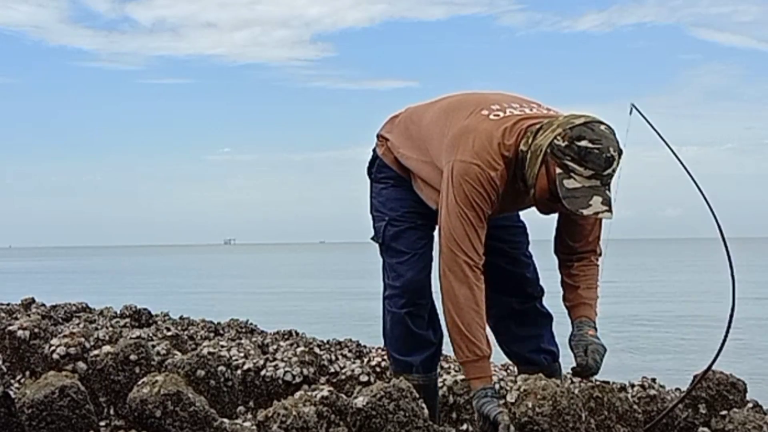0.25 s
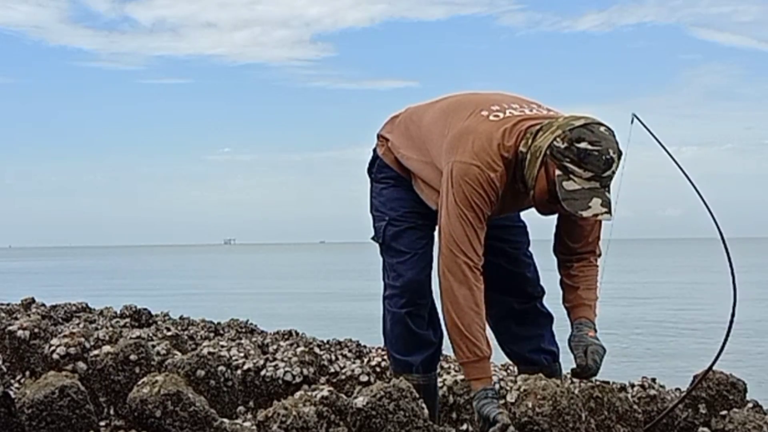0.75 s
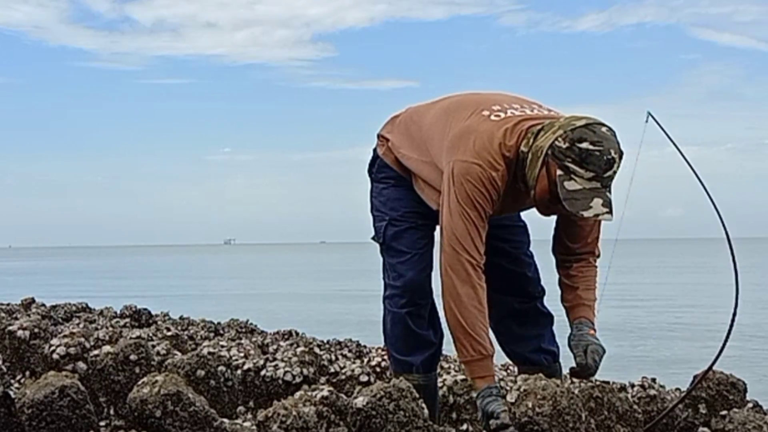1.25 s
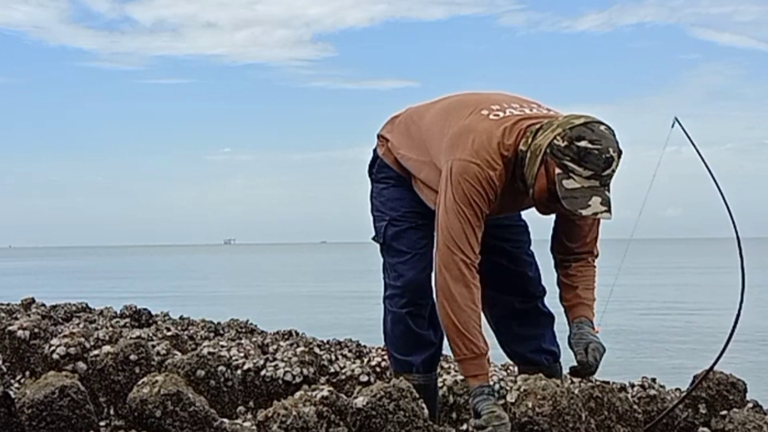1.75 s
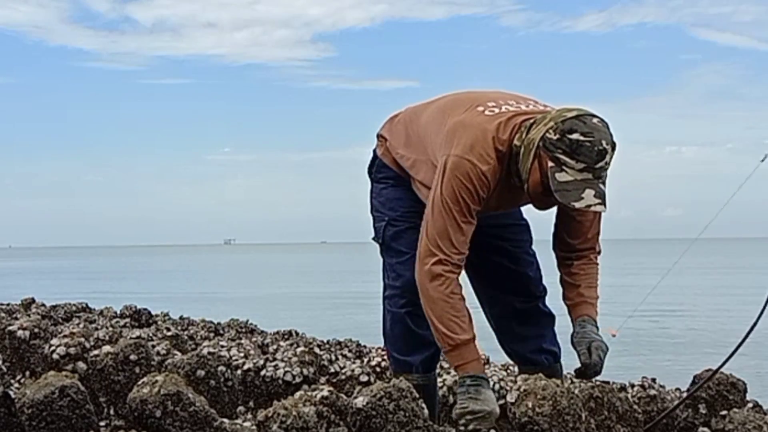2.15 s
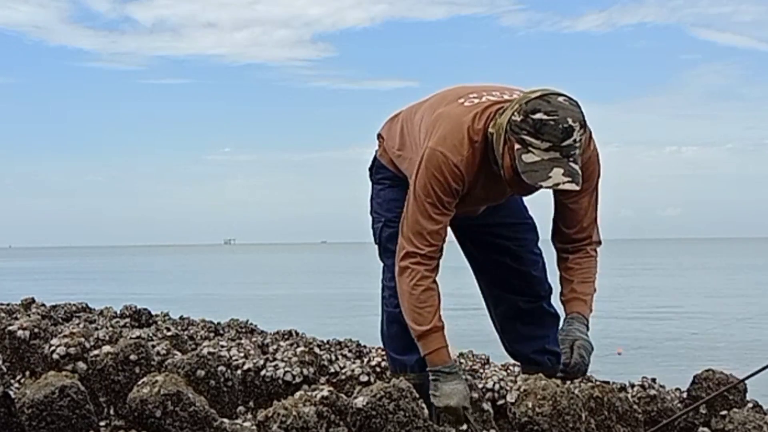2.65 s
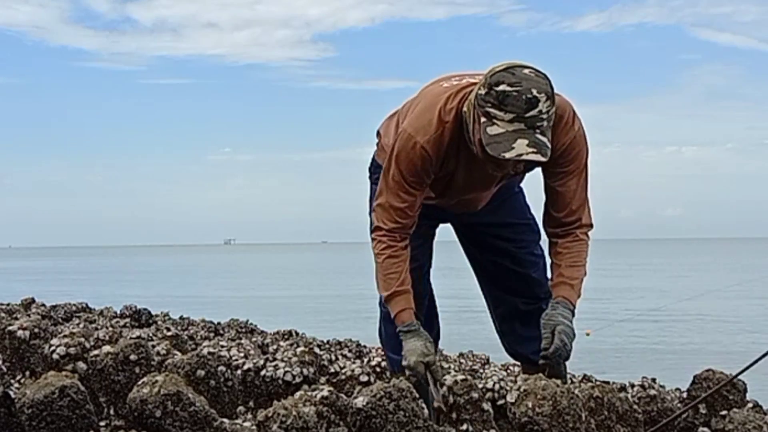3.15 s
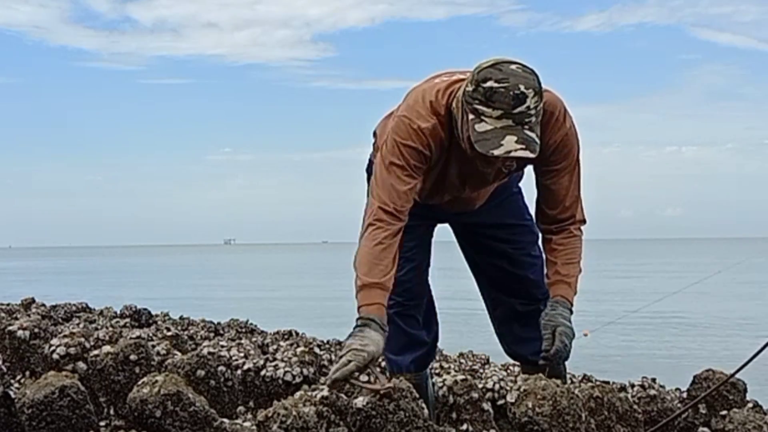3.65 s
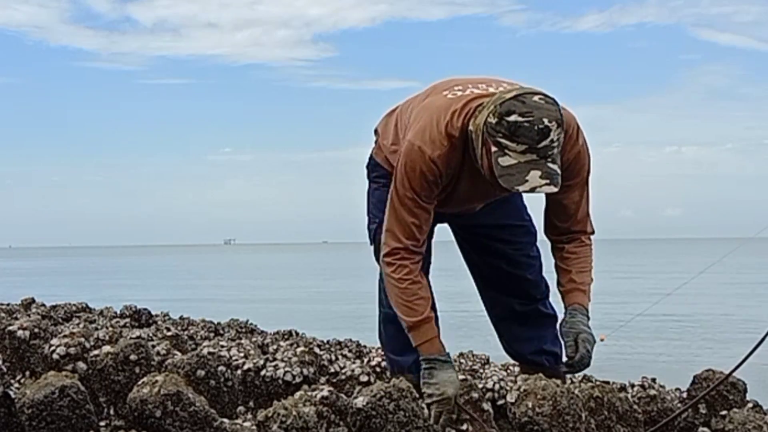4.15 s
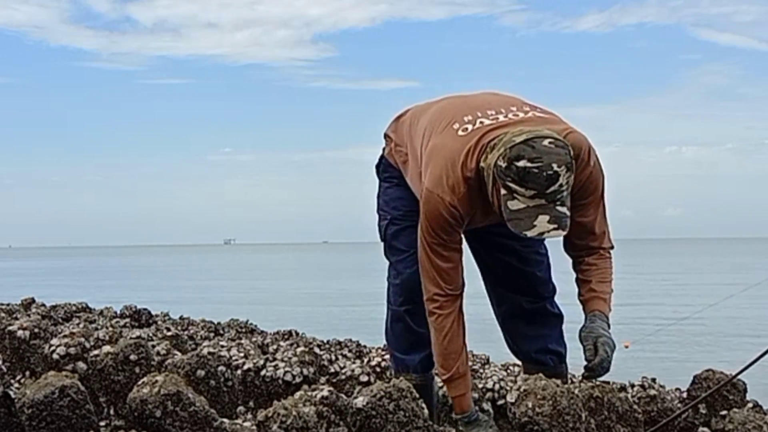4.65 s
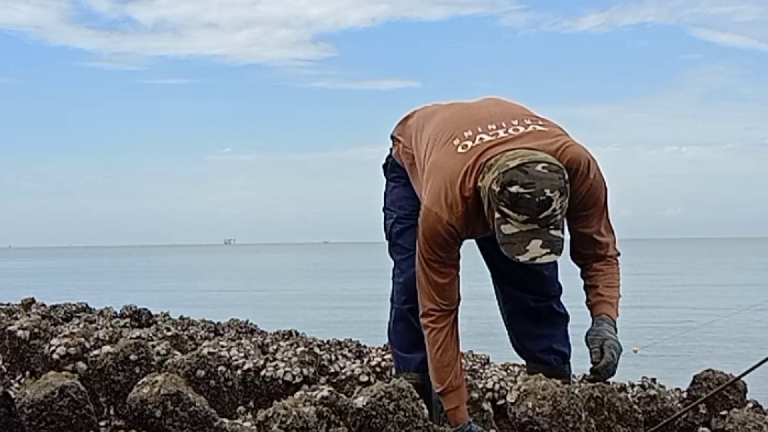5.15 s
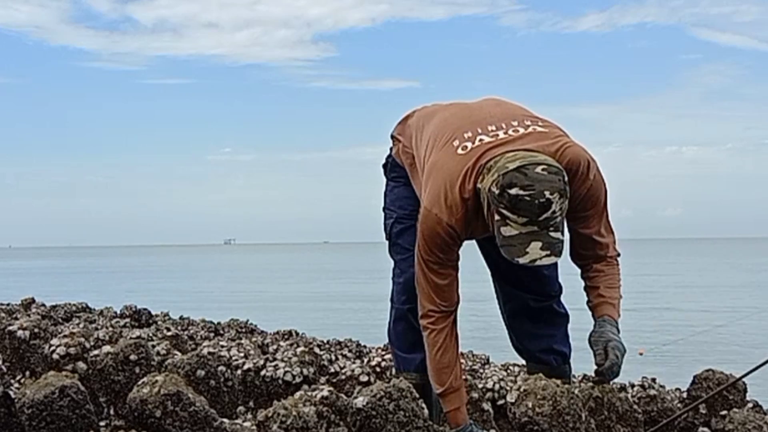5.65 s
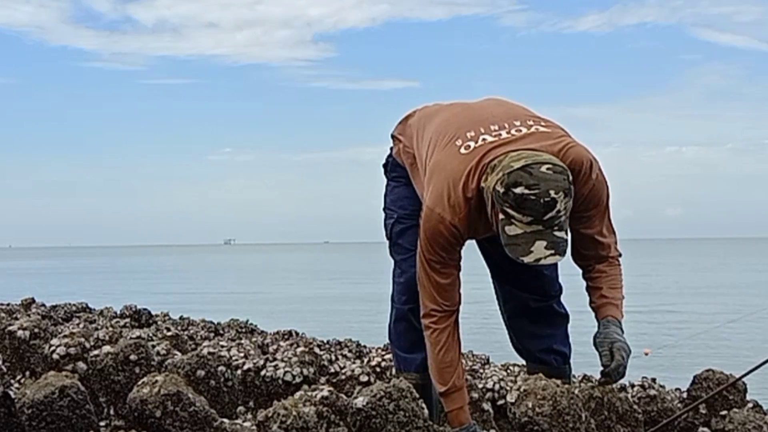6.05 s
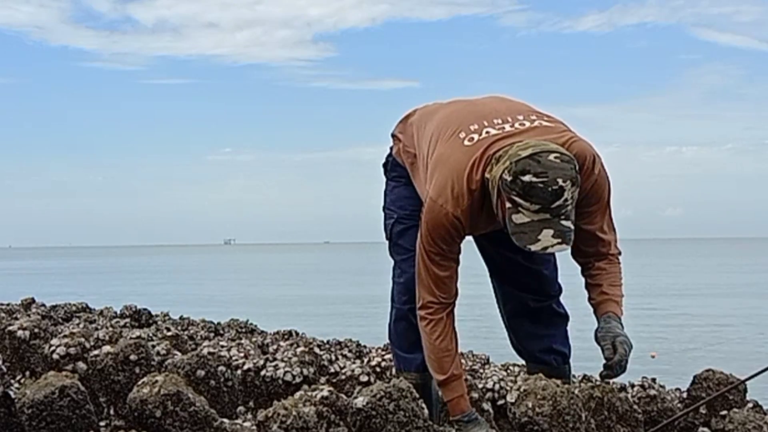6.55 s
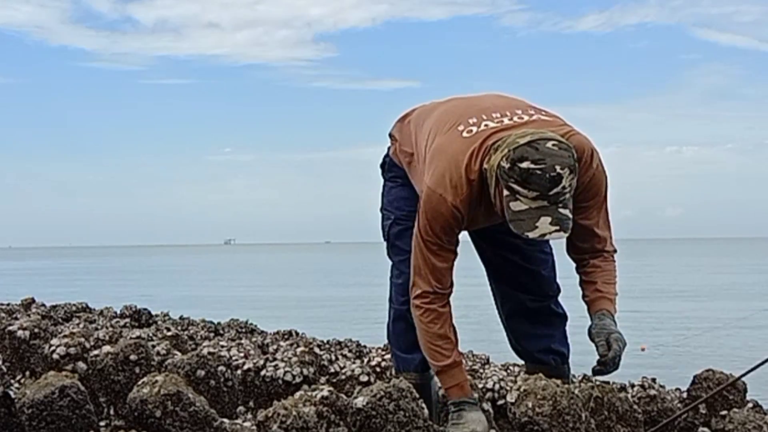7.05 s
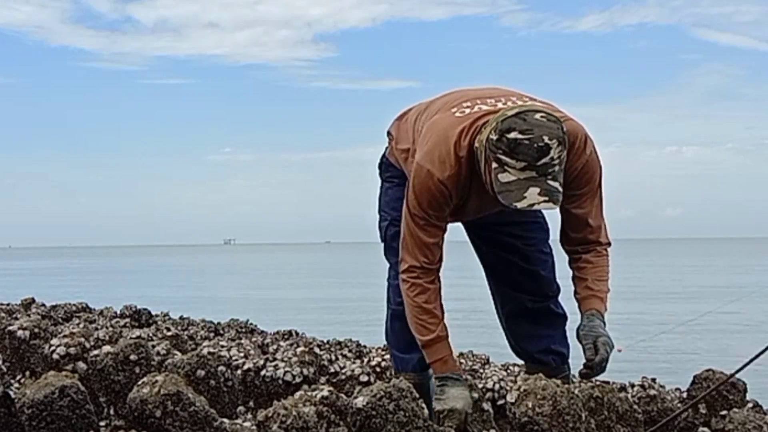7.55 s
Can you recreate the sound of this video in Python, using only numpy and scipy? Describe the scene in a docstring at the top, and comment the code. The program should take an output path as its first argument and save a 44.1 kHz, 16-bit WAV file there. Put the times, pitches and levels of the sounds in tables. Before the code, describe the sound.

Gloved hands pick shells off shore rocks with clicks and crunches, one knocking into a pail, while birds call over faint wind and water.

```python
"""You hear taps, ticks and short crunches as gloved hands pick hard shells off the rocks of a calm shore.
A tossed shell lands twice with a hollow, ringing knock, as in a pail.
One bird whistles high, trilled notes; another gives runs of low, rising chirps.
Behind them, small waves lap with tiny ringing bubbles, a light wind rumbles and the shore hisses."""
import sys
import numpy as np
from scipy import signal
from scipy.fft import rfft, irfft, next_fast_len
from scipy.io import wavfile
from scipy.ndimage import uniform_filter1d, map_coordinates

SR = 44100
rng = np.random.default_rng(int(sys.argv[2]) if len(sys.argv) > 2 else 0)


def put_to_file(sound):
    """Save the sound as 16-bit audio at rate SR, in the file named by the first command-line argument."""
    columns = np.atleast_2d(sound).T  # one column per channel
    safe = np.clip(columns, -1, 1)
    whole_steps = np.round(safe * 32767)
    wavfile.write(sys.argv[1], SR, whole_steps.astype(np.int16))


N = 344421


def amp(db):
    """Turn decibels into a volume factor."""
    return 10 ** (np.asarray(db) / 20)


def unit(x):
    """Scale a sound to an average strength (rms) of 1."""
    return x / np.sqrt(np.mean(x ** 2) + 1e-20)


def clock(length):
    """The time of each sample over length seconds."""
    return np.arange(max(int(length * SR), 2)) / SR


def curve(rows):
    """Join (time, value) points with straight lines across the scene."""
    times, values = np.transpose(rows)
    return np.interp(np.arange(N) / SR, times, values)


def wobble(rate, size):
    """A smooth curve through random points, rate of them a second."""
    points = rng.standard_normal(int(size * rate / SR) + 4)
    return map_coordinates(points, [np.arange(size) * rate / SR])


def noise(colour, size):
    """Noise whose colour (how strong each pitch is) follows (Hz, dB) points."""
    hz, db = np.transpose(colour)
    padded = next_fast_len(size)
    gain = amp(np.interp(np.log(np.fft.rfftfreq(padded, 1 / SR) + 1), np.log(hz), db))
    return unit(irfft(rfft(rng.standard_normal(padded)) * gain, padded)[:size])


def filtered(x, response):
    """Turn each pitch in a sound up or down by response(hz)."""
    padded = next_fast_len(2 * len(x))
    return irfft(rfft(x, padded) * response(np.fft.rfftfreq(padded, 1 / SR)), padded)[:len(x)]


def narrow_noise(hz, width_hz, size, steepness=2):
    """Noise gathered around one pitch: a rough tone."""
    white = rng.standard_normal(size)
    return unit(filtered(white, lambda f: 1 / (1 + ((f - hz) / width_hz) ** steepness)))


def tilted(x, tilt_db):
    """Brighten a sound by tilt_db per octave (below zero dulls it), at strength 1."""
    return unit(filtered(x, lambda hz: amp(tilt_db * np.log2(hz / 4000 + 0.043))))


def patchy(x, depth_db):
    """Give a sound brief random swells at different pitches, at strength 1."""
    slices = signal.stft(x, nperseg=512)[2]
    swells = rng.standard_normal(slices.shape)
    for axis in (0, 0, 1, 1):  # smooth over pitch, then over time
        swells = uniform_filter1d(swells, size=3 + 5 * axis, axis=axis)
    return unit(signal.istft(slices * amp(depth_db * unit(swells)), nperseg=512)[1][:len(x)])


def fade(t, t60):
    """Die away by 60 dB in t60 seconds, the fade time."""
    return np.exp(-np.log(1000) * t / t60)


def rise(t, seconds):
    """Climb from silence towards full volume; fewer seconds give a sharper start."""
    return 1 - np.exp(-t / seconds)


def add(track, start, sound):
    """Mix a sound into the track at start seconds."""
    part = track[max(round(start * SR), 0):][:len(sound)]
    part += sound[:len(part)]


def rock_echo(x, t60, echo_db):
    """A sound plus its blurred echo from the rocks."""
    t = clock(.5)
    tail = rng.standard_normal(len(t)) * fade(t, t60)
    return x + amp(echo_db) * signal.fftconvolve(x, tail / np.linalg.norm(tail))[:N]


# colour of the shore's hiss: (pitch [Hz], level [dB])
HISS_COLOUR = [(100, 14.5), (400, 2), (1300, -9), (2500, -9), (3400, -6), (4200, -11), (5400, 0.5),
               (7200, -9), (7900, 8), (9000, -5), (10200, 1), (11200, -14), (12300, -14.5), (15500, -10)]
# how loudly the small waves lap: (time [s], level [dB])
LAPPING = [(0, -77), (2.6, -79.5), (3.25, -74.5), (3.7, -74.5), (4.2, -75), (4.55, -67.5), (5.2, -68),
           (5.45, -77.5), (6.2, -76.5), (6.7, -71), (7.33, -69.5), (7.6, -61), (7.81, -62.5)]


def hiss():
    """The faint, even hiss of the open shore rises a little with the lapping."""
    lap_db = curve(LAPPING)
    hiss_db = -71.5 + 0.211 * (lap_db - lap_db.mean())
    return amp(hiss_db + .5 * wobble(4.2, N)) * patchy(noise(HISS_COLOUR, N), depth_db=3)


# colours of the wind's deep rumble and its higher flapping: (pitch [Hz], level [dB])
RUMBLE_COLOUR = [(20, -31.5), (45, -24.5), (66, 5), (95, -8), (135, -6), (200, -20.5), (400, -49.5),
                 (900, -94.5)]
FLAP_COLOUR = [(90, -53), (170, -7.5), (235, 5.5), (310, -8), (420, -36.5), (900, -34), (2000, -89)]
# gusts: (peak time [s], time to swell or fade [s], rumble level [dB], flapping level [dB])
WIND_GUSTS = [(.03, 0.034, -58.5, -84.5), (1.312, 0.047, -64, -89), (1.589, 0.048, -58, -83),
              (1.961, 0.055, -64, -86.5), (2.503, 0.022, -58, -92), (2.826, 0.029, -58, -65.5),
              (3.074, 0.097, -59.5, -91.5), (3.418, 0.061, -55, -87), (3.7, 0.16, -58.5, -85),
              (5.554, 0.062, -52, -65.5), (5.992, 0.044, -53, -57), (6.201, 0.026, -57.5, -70),
              (6.44, 0.046, -51, -55.5), (6.97, 0.076, -60.5, -61), (7.16, 0.097, -58, -48),
              (7.645, 0.16, -59, -59)]


def wind():
    """A light, swirling breeze rumbles on the microphone; gusts push harder and add flapping."""
    t = np.arange(N) / SR
    breeze_db, swirl_db, swirls_per_s = -66, 2, 8.3
    rumble = amp(breeze_db + swirl_db * wobble(swirls_per_s, N))
    flap = np.zeros(N)
    for peak, width, rumble_db, flap_db in WIND_GUSTS:
        gust = np.exp(-((t - peak) / width) ** 2)
        rumble += amp(rumble_db) * gust
        flap += amp(flap_db) * gust
    return rumble * noise(RUMBLE_COLOUR, N) + flap * noise(FLAP_COLOUR, N)


def bubble(hz, cycles):
    """A bubble rings briefly and rises in pitch as it fades."""
    t = clock(cycles / hz)
    tone = np.sin(2 * np.pi * hz * t * (1 + 0.043 * t / t[-1]))
    return tone * fade(t, t[-1]) * rise(t, 0.0018)


# colour of sloshing water: (pitch [Hz], level [dB])
SLOSH_COLOUR = [(150, -14), (350, -6.5), (600, -2), (1250, 8), (2200, -5.5), (3300, -0.5), (4200, -15.5),
                (5500, -1.5), (9000, -20.5), (15000, -32.5)]
# clear drips among the rocks: (time [s], pitch [Hz], relative level [dB])
WATER_DRIPS = [(0.527, 1580, -64), (.765, 764, -64), (0.899, 1402, -64), (2.113, 1670, -67),
               (2.406, 1363, -59.5), (4.511, 1062, -53.5), (4.853, 1430, -50.5)]


def water():
    """Small waves slosh between the rocks, making tiny bubbles and a few clear drips."""
    bubbles, drips = np.zeros(N), np.zeros(N)
    for when, pitch, size in rng.standard_normal((1300, 3)):
        hz = 1500 * np.exp(1.25 * np.tanh(.4 * pitch))
        strength = amp(3.5 * size) * np.sqrt(1000 / hz)  # low bubbles are louder
        add(bubbles, (when % 1) * N / SR, strength * bubble(hz, cycles=70))
    for start, hz, db in WATER_DRIPS:
        add(drips, start, amp(db + 4) * bubble(hz, cycles=110))
    slosh = patchy(noise(SLOSH_COLOUR, N), depth_db=4.5)
    waves = amp(curve(LAPPING)) * (amp(-3.5) * slosh + amp(-5) * unit(bubbles))
    return rock_echo(waves + drips, t60=.2, echo_db=-7)


# faint tones under the first run of chirps: (time [s], length [s], pitch [Hz], level [dB])
HOARSE_TONES = [(3.129, 0.36, 692.6, -69.5), (3.157, 0.117, 980, -55.5)]


def undertones():
    """A hoarse tone swells and fades under the chirps, with a brief second tone at the chirps' low pitch."""
    out = np.zeros(N)
    for start, length, hz, db in HOARSE_TONES:
        t = clock(length)
        tone = narrow_noise(hz, width_hz=39, size=len(t), steepness=4)
        add(out, start, amp(db) * tone * np.sin(np.pi * t / length))
    return out


# whistled notes: (time [s], length [s], starting pitch [Hz], fall over the note [Hz],
# extra fall at the end [Hz], relative level swelled to [dB], size of the swell [dB])
WHISTLED_NOTES = [(3.08, .28, 2830, 310, 0, -71.5, 0), (3.42, .38, 5730, 700, 0, -53.5, 20),
                  (3.98, .41, 4560, 30, 60, -63, 0), (4.58, .52, 5140, 560, 20, -53, 19),
                  (5.39, .365, 4200, 20, 10, -60.5, 14), (5.92, .55, 5310, 240, 150, -47.5, 13),
                  (6.88, .43, 3770, 160, 0, -61.5, 6), (7.52, .38, 3440, 60, 0, -61, 12)]


def whistling_bird():
    """A bird's notes sink in pitch and mostly swell; each fast trill settles into a pure tone."""
    out = np.zeros(N)
    trills_per_s, trill_share, trill_hz, trill_depth = 64, 0.83, 44.74, .36
    rasp_hz, waver_hz, rise_s, fall_s = 45, 17.2, 0.043, 0.059
    for start, length, start_hz, fall_hz, droop_hz, db, swell_db in WHISTLED_NOTES:
        t = clock(length)
        progress = t / t[-1]
        trilling = np.clip((trill_share * length - t) / 0.022, 0, 1)
        beat = 2 * np.pi * (trills_per_s * t + .4 * wobble(30, len(t)))
        hz = start_hz - fall_hz * progress - droop_hz * np.interp(progress, [trill_share, 1], [0, 1])
        hz += trilling * (trill_hz * np.sin(beat) + rasp_hz * wobble(300, len(t)))
        hz += waver_hz * wobble(40, len(t))
        tone = np.sqrt(2) * np.sin(2 * np.pi * np.cumsum(hz) / SR)
        pulse = 1 - trill_depth * trilling * (1 + np.cos(beat))
        edges = np.clip(np.minimum(t / rise_s, (t[-1] - t) / fall_s), 0, 1)
        swell = amp(db - 0.5 - swell_db * (1 - progress) + 2.2 * wobble(55, len(t)))
        add(out, start, edges * swell * pulse * tone)
    return rock_echo(out, t60=.2, echo_db=-14)


def chirp(length, start_hz, top_hz):
    """One mellow, hoarse note: it holds its first pitch, leaps to the top and sags if it is long."""
    t = clock(length)
    glide_s, sag_after_s, sag_hz_per_s = 0.0034, .1, 1750
    rasp_hz, rasp_db = 26, 3
    leap_time = min(0.21 * length + glide_s, .021)
    leap = .5 + .5 * np.tanh((t - leap_time) / (2 * glide_s))
    hz = start_hz + (top_hz - start_hz) * leap - sag_hz_per_s * np.maximum(t - sag_after_s, 0)
    phase = 2 * np.pi * np.cumsum(hz + rasp_hz * wobble(300, len(t))) / SR
    tone = np.sin(phase) + amp(-40) * np.sin(2 * phase)
    edges = np.clip(np.minimum(t / .007, (t[-1] - t) / .012), 0, 1)
    return edges * amp(rasp_db * wobble(150, len(t))) * tone


# runs of chirps, with relative levels: (time [s], wait for the first short note [s],
# growth of each gap [factor], long note [dB], next three notes [dB], last note [dB])
CHIRP_RUNS = [(3.044, .206, 1.225, -41, -48, -39.5), (5.952, .198, 1.15, -40.5, -43.5, -43.5)]
# faint peeps on one pitch: (time [s], relative level [dB])
FAINT_PEEPS = [(0.058, -64.5), (0.278, -62.5), (3.62, -67), (5.089, -65), (6.618, -63.5)]


def chirping_bird():
    """A bird sings runs of one long, quivering note and four short ones that slow down; it also peeps."""
    out = np.zeros(N)
    long_s, short_s, gap_s, note_growth = .175, .037, .076, 1.203
    low_hz, peep_hz, quivers_per_s = 987, 1251, 23.35
    quiver_time = np.maximum(clock(long_s), .021)  # held still until the pitch leaps
    quiver = 1 - 0.7 * np.cos(np.pi * quivers_per_s * quiver_time) ** 6
    for start, wait, slowing, long_db, short_db, last_db in CHIRP_RUNS:
        add(out, start, amp(long_db) * quiver * chirp(long_s, low_hz, top_hz=1326.4))
        when = start + wait
        for k, db in enumerate([short_db, short_db, short_db, last_db]):
            add(out, when, amp(db) * chirp(short_s * note_growth ** k, low_hz, top_hz=1270))
            when += gap_s * slowing ** k
    for start, db in FAINT_PEEPS:
        add(out, start, amp(db) * chirp(0.07, peep_hz, peep_hz))
    return amp(-3) * rock_echo(out, t60=0.23, echo_db=-8)


# colour of cracking shell: (pitch [Hz], level [dB])
CRUNCH_COLOUR = [(200, -17.5), (500, -16), (1400, -6.5), (2500, -8.5), (3400, -7), (4200, -5.5), (5600, 3),
                 (7200, 2), (8200, 5), (10000, -6), (11000, -8.5), (12400, 4), (13500, -4), (15500, -6.5)]
# shells crunching under the glove: (time [s], level [dB], length [s], brightening [dB per octave])
SHELL_CRUNCHES = [(2.707, -58.5, 0.0198, 5), (2.808, -43.5, 0.026, -5.5), (2.835, -45.5, 0.039, -1),
                  (6.453, -63, 0.035, -6.5), (7.16, -53.5, 0.035, 0), (7.238, -61, 0.0305, -3.5),
                  (7.359, -57.5, 0.038, -1.5), (7.439, -55, .04, -4), (7.498, -56.5, 0.0346, -0.5),
                  (7.561, -51.5, 0.042, -1.5), (7.598, -63.5, .15, -7.5), (7.674, -59.5, .043, 3)]
# hands rummaging among the shells: (start [s], end [s], level of the weakest grit [dB])
RUMMAGING = [(2.6, 3.5, -67.5), (6.0, 6.5, -72.5), (7.15, 7.8, -68.5)]


def crunches():
    """Shell edges scrape in bursts of tiny breaks; grit crackles, louder while the hands rummage."""
    out, t = np.zeros(N), clock(0.6)
    for start, db, length, tilt_db in SHELL_CRUNCHES:
        roughness = amp(4 * wobble(400, len(t)))
        grains = unit(roughness * patchy(noise(CRUNCH_COLOUR, len(t)), depth_db=3))
        stroke = rise(t, 0.0017) * np.exp(-(t / length) ** 3)
        add(out, start, amp(db) * tilted(grains, tilt_db) * stroke)
    t = clock(.05)
    grains_per_s, idle_db, range_db = 24, -75.5, 12
    for when, size in rng.random((int(grains_per_s * N / SR), 2)):
        start = when * N / SR
        db = max([idle_db] + [level for begin, end, level in RUMMAGING if begin < start < end])
        grit = patchy(noise(CRUNCH_COLOUR, len(t)), depth_db=7)
        grit = tilted(grit, -1.5) * fade(t, .045) * rise(t, .002)  # the glove dulls it
        add(out, start, amp(db + range_db * size ** 2) * grit)  # most grains are weak
    return rock_echo(out, t60=.045, echo_db=-3)


# ticks of loose shells, and at 1.926 s the long ring of the shell tapped just before: (time [s], level [dB],
# pitch [Hz], fade time [s])
SHELL_TICKS = [(0.868, -52.5, 2190, 0.0089), (1.877, -45, 8820, 0.011), (1.926, -66, 3270, 0.43),
               (1.9832, -49.5, 5940, .057), (2.202, -49.5, 5586, 0.032), (2.2354, -61, 13000, 0.053),
               (2.557, -52, 450, 0.069), (2.7826, -46, 1205, 0.0566), (2.956, -53, 10600, 0.012),
               (2.9722, -45, 5490, 0.015), (3.4799, -53, 6950, 0.031), (4.469, -55.5, 5260, 0.043),
               (5.7556, -52, 8501, 0.018), (6.156, -67.5, 3340, 0.133), (6.252, -58.5, 5930, 0.017),
               (7.1662, -42.5, 5500, 0.044), (7.3942, -46.5, 10300, .009), (7.5034, -54.5, 12400, .034),
               (7.5792, -44, 6040, 0.0335)]


def ticks():
    """Loose shells touch with a tiny crack and a rough ring; nine faint extra ticks come by chance."""
    out, t = np.zeros(N), clock(0.3)
    strays = [((when % 1) * N / SR, -64.5 + 2 * size, 6200 * 2 ** (0.4 * pitch), .04)
              for when, size, pitch in rng.standard_normal((9, 3))]
    for start, db, hz, t60 in SHELL_TICKS + strays:
        ring = narrow_noise(hz, width_hz=0.072 * hz, size=len(t)) * fade(t, t60)
        crack = amp(-5.5) * noise(CRUNCH_COLOUR, len(t)) * fade(t, 0.01)
        add(out, start, amp(db) * (ring + crack) * rise(t, 0.000094))
    return rock_echo(out, t60=0.15, echo_db=-8.5)


# colour of a tap: (pitch [Hz], level [dB])
TAP_COLOUR = [(150, -59), (350, -15), (800, -14.5), (1350, 3.5), (2500, -8), (3300, 12), (4200, -8),
              (5600, 14), (7000, 5.5), (8400, 7), (10000, -3), (15500, -2.5)]
# taps: (time [s], level [dB], click fade time [s], brightening [dB per octave], shell's note [Hz])
SHELL_TAPS = [(1.9191, -28.5, 0.027, -2, 3140), (1.9242, -37, 0.041, -5, 2040),
              (2.8138, -26, 0.0057, -1.5, 7200), (2.8254, -29, 0.0072, 4.5, 7500),
              (6.9240, -23, 0.022, -3.5, 5420), (6.9271, -31, 0.011, -3, 5800)]


def taps():
    """A shell hits rock: a click coloured by the shell's own note, a dull thud and a short echo."""
    out, t = np.zeros(N), clock(0.27)
    for start, db, t60, tilt_db, note_hz in SHELL_TAPS:
        burst = noise(TAP_COLOUR, len(t))
        shell = filtered(burst, lambda hz: 1 + 1.2 / (1 + ((hz - note_hz) / (0.083 * note_hz)) ** 2))
        echo = amp(-20.5) * fade(t, 0.25)
        click = tilted(shell, tilt_db) * (fade(t, t60) + echo)
        thud = amp(-32.5) * narrow_noise(hz=334.6, width_hz=24, size=len(t)) * fade(t, 0.19)
        add(out, start, amp(db) * (click + thud) * rise(t, .0001))
    return out


# colours of the crack on the pail's wall and bottom, and of the clatter: (pitch [Hz], level [dB])
WALL_COLOUR = [(180, -45.5), (380, -2.5), (750, -13), (1250, 4.5), (2200, -10), (2900, -21), (3550, 1),
               (4250, -9.5), (5700, 7), (6700, -7), (8100, 7.5), (10200, -5.5), (13200, -2.5), (15100, -8)]
BOTTOM_COLOUR = [(180, -41), (380, 0), (750, -8.5), (1150, 8), (2000, -6.5), (2900, -17), (3500, 10.5),
                 (4200, -15), (5100, 6), (6700, -3.5), (7600, 9.5), (9000, -5), (13500, -3.5),
                 (15300, -10.5)]
CLATTER_COLOUR = [(200, -28), (380, -0.5), (650, -3.5), (1200, -12), (2500, -12.5), (3500, -7.5),
                  (4300, -13.5), (5100, 6), (5850, 1), (6800, -5.5), (8000, 3.5), (10000, -8.5),
                  (13200, -10.5), (15200, -3.5)]
# ringing tones of shell and pail, with relative levels:
# (pitch [Hz], fade time [s], hit on the wall [dB], hit on the bottom [dB])
RING_TONES = [(346, 0.13, -18, -16), (396, 0.13, -11, -11), (521, 0.13, -18, -19), (638, 0.13, -19, -18),
              (720, 0.09, -21, -21), (810, 0.09, -21, -21), (1000, 0.09, -21, -22), (1289, 0.09, -21, -20),
              (1841, 0.09, -35, -37), (3453, 0.17, -18, -18), (3680, 0.17, -35, -35),
              (5020, 0.17, -23, -27), (5058, 0.17, -17, -19), (5097, 0.17, -18, -20),
              (5720, 0.17, -17, -29), (5797, 0.17, -10, -28), (5921, 0.17, -22, -29),
              (6026, 0.17, -32, -26), (6342, 0.17, -35, -26), (7737, 0.17, -35, -23),
              (8145, 0.17, -20, -25), (8224, 0.17, -18, -25), (8873, 0.17, -15, -34),
              (9560, 0.17, -32, -30), (10620, 0.14, -20, -35), (12138, 0.14, -18, -31),
              (12604, 0.14, -20, -28), (14468, 0.14, -17, -33), (15290, 0.08, -20, -17)]
# the tossed shell's hits: (time [s], relative level [dB], spot [0 = wall, 1 = bottom])
PAIL_HITS = [(3.7462, 0, 0), (3.7745, -15, 0), (3.8928, 1, 1)]


def landings():
    """A shell lands in a pail: a hard crack, a dying clatter and a ring that depends on the spot hit."""
    out, t = np.zeros(N), clock(0.75)
    hz, t60, wall_db, bottom_db = np.transpose(RING_TONES)[:, :, None]
    for start, db, spot in PAIL_HITS:
        rattle = np.array([wobble(92, len(t)) for _ in hz])  # the settling shell shakes every tone
        phase = 2 * np.pi * (hz * t + rng.random(hz.shape)) + .28 * rattle
        strengths = amp(wall_db + spot * (bottom_db - wall_db))
        ring = amp(-15.5) * np.sum(strengths * fade(t, t60) * np.sin(phase), axis=0)
        roughness = unit(amp(2 * wobble(500, len(t))))
        burst = (1 - spot) * noise(WALL_COLOUR, len(t)) + spot * noise(BOTTOM_COLOUR, len(t))
        crack = amp(-9.5 - 1.5 * spot) * burst * fade(t, .05 - .02 * spot)
        clatter = amp(-22.5 - 0.73 * spot) * noise(CLATTER_COLOUR, len(t)) * fade(t, .18) * roughness
        add(out, start, amp(db + 0.84) * (crack + clatter + ring) * rise(t, .0007))
    bass_cut = signal.butter(4, 260, "high", fs=SR, output="sos")  # so small a thing gives no bass
    return signal.sosfilt(bass_cut, out)


def scene():
    """Shells in front, with birds, water and wind around them, in one channel."""
    shells = landings() + taps() + ticks() + crunches()
    birds = whistling_bird() + chirping_bird()
    background = undertones() + water() + wind() + hiss()
    return (shells + birds + background)[None]


def record(dry):
    """Cut away the very highest treble."""
    top_hz = 15850
    return np.array([filtered(channel, lambda hz: 1 / (1 + (hz / top_hz) ** 160)) for channel in dry])


dry = scene()
out = record(dry)
put_to_file(out)
```